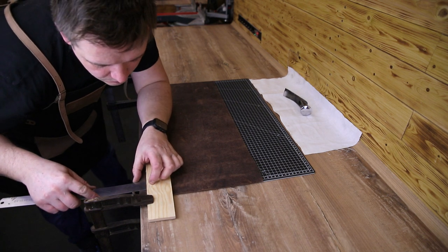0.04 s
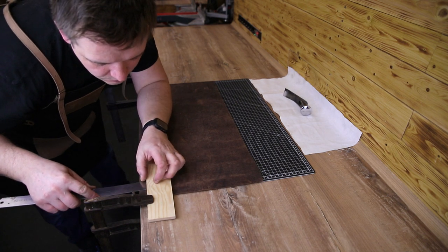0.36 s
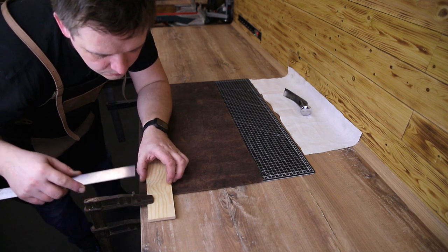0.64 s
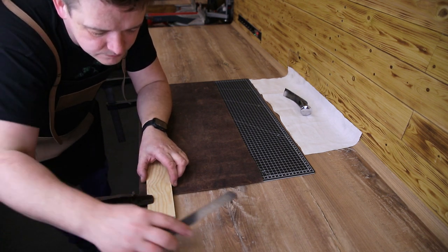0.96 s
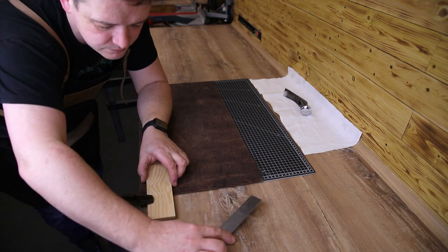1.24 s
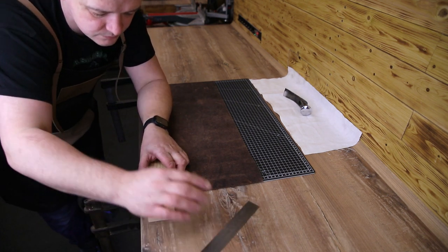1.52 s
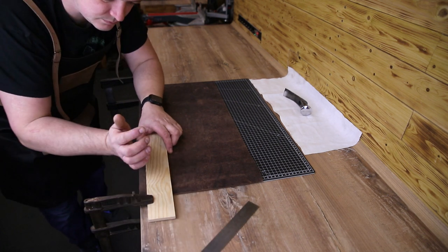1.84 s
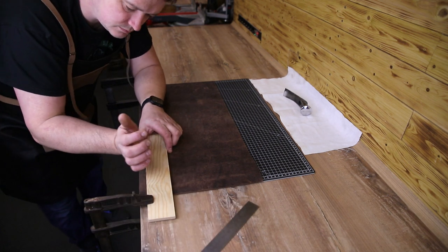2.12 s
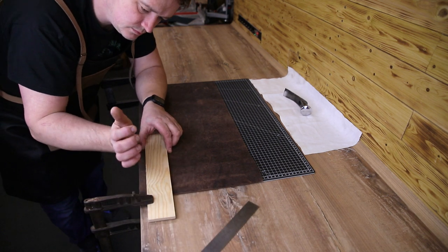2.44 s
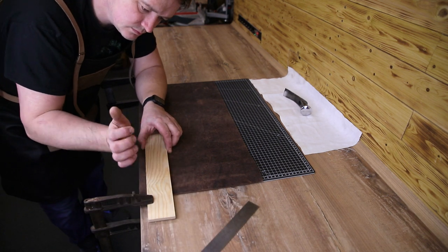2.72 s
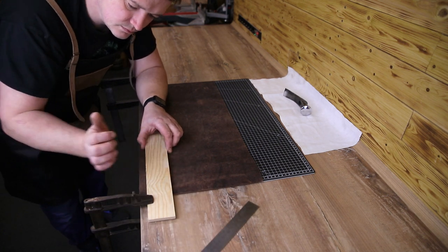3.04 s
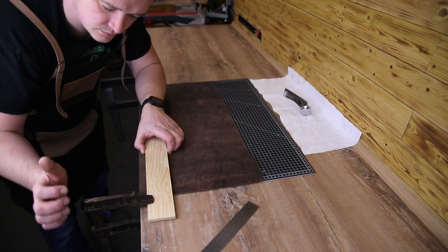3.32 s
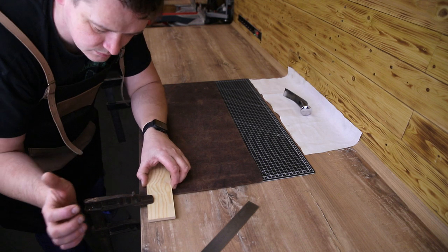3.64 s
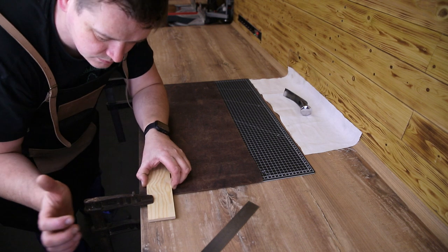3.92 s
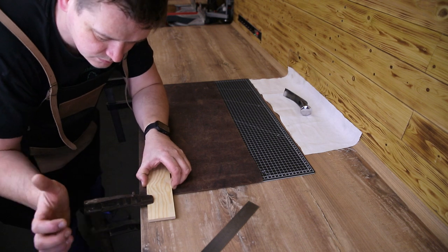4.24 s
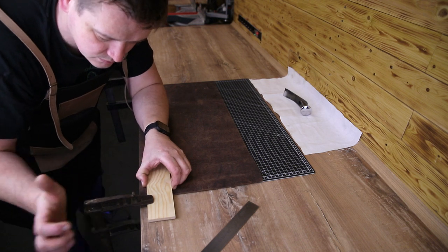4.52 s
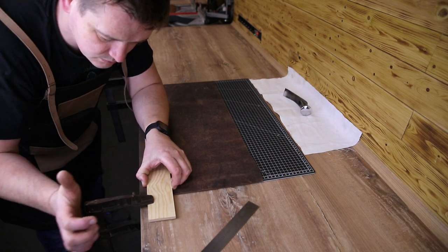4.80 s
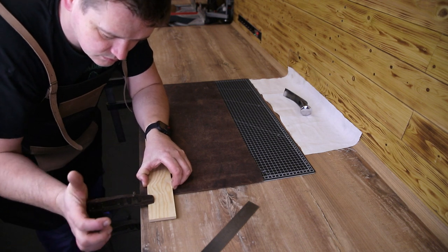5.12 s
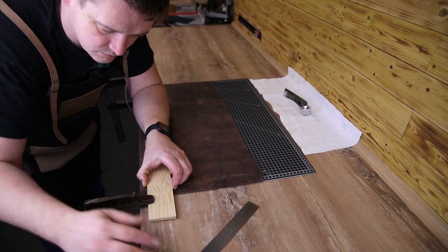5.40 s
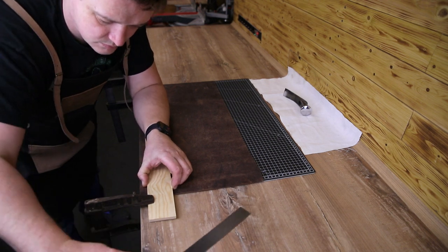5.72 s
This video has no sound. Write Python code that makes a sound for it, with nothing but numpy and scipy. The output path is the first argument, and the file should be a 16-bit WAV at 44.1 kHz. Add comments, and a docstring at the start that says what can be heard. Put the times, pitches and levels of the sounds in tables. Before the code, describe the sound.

In a small workshop, a sleeve rustles faintly over a low room rumble. A steel rule drops onto the wooden bench with a sharp, ringing clatter and is nudged aside. A hand brushes and pats a clamped wooden strip, which clacks hollowly. Four knocks at the clamp grow harder, making the bench boom. Finally the rule scrapes briefly across the wood, all heard from nearby.

```python
"""Over a low room rumble, a sleeve rustles and a hand brushes and pats a clamped strip of wood.
A steel rule drops on the workbench: it cracks, bounces, rings bright and is pushed aside.
The hand slides along the strip, which clacks hollowly under its clamp, then knocks at the clamp four
times, harder and harder; the bench booms and the clamp shudders. Last, the rule is dragged over the
bench, scraping and singing, with one tiny squeak. The small workshop reflects every move."""
import sys
import numpy as np
from scipy import signal
from scipy.fft import rfft, irfft
from scipy.io import wavfile
from scipy.ndimage import uniform_filter1d

SR = 44100
rng = np.random.default_rng(int(sys.argv[2]) if len(sys.argv) > 2 else 0)


def log_audio(samples):
    """Write samples as a 16-bit WAV file to the path given in sys.argv[1]."""
    # one column per channel
    frames = np.atleast_2d(samples).T
    # limit to full scale, then quantise
    limited = np.clip(frames, -1, 1)
    pcm = np.round(limited * 32767).astype(np.int16)
    wavfile.write(sys.argv[1], SR, pcm)


N = 262836
TIME = np.arange(N) / SR
RING_TIME = TIME[:SR // 2]

# Noise colours, shape only: freq_hz, density_db
ROOM_RUMBLE = [(12, -29.5), (20, -13), (59, -5.5), (93, -9), (161, -8.5), (282, -15), (352, -17.5),
               (535, -20.5), (598, -18.5), (727, -20), (934, -19.5), (2210, -27), (3090, -28),
               (15600, -40.5)]
SLEEVE_RUSTLE = [(88, -38.5), (150, -14.5), (193, -5.5), (386, -4.5), (477, -11), (535, -7.5), (1030, -6),
                 (6300, -20), (15000, -34.5)]
SKIN_RUB = [(100, -15.5), (400, -2), (700, -5.5), (1200, 4.5), (2000, -0.5), (3200, 1.5), (5000, -5),
            (8000, -7.5), (11000, -16), (15500, -26.5)]
HARD_TICK = [(100, -8), (500, 3), (1400, 7.5), (2200, 1), (3200, 0.5), (4800, -2), (6200, -1.5), (7400, -2),
             (8700, -3.5), (9500, -13), (15500, -20)]
WOOD_SLAP = [(60, -24.5), (150, -9), (350, -5), (500, -8), (690, -4), (900, -4.5), (1300, -4), (2000, -13),
             (3000, -19.5), (4000, -22.5), (5500, -27), (9000, -33.5), (15500, -43.5)]
BENCH_THUD = [(40, -21), (80, -4), (105, -8), (140, -1.5), (250, -1), (400, -3.5), (680, -1.5),
              (1200, -14.5), (4000, -44)]
STEEL_CRACK = [(60, -25), (200, -18.5), (370, -4), (550, -6), (900, -8.5), (1700, 0), (2800, -1.5),
               (4400, 2), (5500, -1.5), (7400, 1.5), (9000, -11), (15500, -11)]
STEEL_SIZZLE = [(1000, -30.5), (4000, -12), (5600, -7), (6400, 11.5), (7400, -4.5), (8400, -7.5),
                (11000, -9.5), (15500, -23)]  # the crowd of weak modes between the rule's strong ones
STEEL_SCRAPE = [(100, -16.5), (400, -8), (700, -9), (1000, -4), (1500, -2), (2100, -6), (2600, -3.5),
                (3700, -7), (5000, -12.5), (6800, -10.5), (9000, -19), (15500, -32.5)]
CLAMP_CHATTER = [(60, -25), (120, -7), (195, 6), (270, -2.5), (320, -7.5), (380, -1.5), (600, -16.5),
                 (1000, -24), (3000, -50), (15000, -77)]

# Steel modes: freq_hz, level_db, t60_s
CLINK_MODES = [(2870, -2.5, 0.058), (3370, 1.5, 0.044)]  # under a light touch
HELD_RULE_MODES = [(375, -8, 0.18), (726, -12, .1), (1432, -12, .15), (2570, -8.5, 0.39), (2830, -9, .08),
                   (4210, -9.5, .15)]  # held, leaning on the bench
FREE_RULE_MODES = [(1588, -15.5, .15), (1687, -15.5, 0.08), (2540, -24, 0.17), (2790, -17, 0.092),
                   (4280, -17.5, .1), (4280, -11, .12), (5416, -14, .22), (6180, -8, 0.37), (6530, -8, .3),
                   (6417, -3, .3), (6825, -13.5, .18), (6860, -8, 0.2), (7104, 0.5, 0.26), (7520, -9, 0.37),
                   (8280, -13.5, .18), (7880, -9, .15), (8470, -21, .2), (8700, -23, 0.28),
                   (8430, -15.5, 0.33), (8910, -22.5, 0.74), (9685, -25.5, .2), (9940, -17, 0.13),
                   (10540, -21, 0.26), (10400, -27, .2), (12460, -26, .15), (15430, -33.5, 0.1536)]
# Resonances of the wooden strip: freq_hz, width_hz, gain_db
STRIP_RESONANCES = [(428.8, 97, -2), (1245, 75, -3.5), (1670, 55, -7), (2779, 81, 3.5)]
# Modes of the bench with its clamp: freq_hz, level_db
BENCH_MODES = [(80, -3.5), (140, 4), (160, -9.5), (199, 2), (222, 1.5), (257, -1), (339, -3), (374, 6),
               (441, -9.5), (492, -6.5), (576, -4), (635, -6.5), (705, -9.5), (885, -1.5), (1055, -2.5)]
# Decay of the workshop: freq_hz, t60_s
ROOM_DECAY = [(100, 0.94), (300, 0.52), (800, 0.36), (2000, 0.39), (5000, 0.51), (9000, 0.27),
              (15000, 0.33)]

# Cue levels below are relative; each layer adds its own trim.
# Rubbing moves: start_s, end_s, level_db
SLEEVE_MOVES = [(.44, .7, -60), (.96, 1.45, -56.5), (2.0, 2.15, -61.5), (2.38, 2.54, -60),
                (3.24, 3.7, -55.5), (3.8, 4.15, -64)]
STRIP_SLIDES = [(1.76, 1.98, -46), (3.425, 3.655, -44.6)]
# The palm brushes past the wood: middle_s, level_db, half_length_s
PALM_BRUSHES = [(0.498, -52, 0.024), (0.746, -58, 0.028), (1.152, -56.5, 0.018), (2.458, -39, 0.015),
                (2.703, -41, 0.017), (2.982, -41.5, 0.017), (3.055, -49.5, 0.011)]
# Small hard contacts: start_s, level_db, t60_s
LIGHT_TAPS = [(0.63, -50, 0.016), (2.024, -43.5, 0.0044), (2.086, -49, 0.017), (2.669, -46.5, .02),
              (2.951, -45, 0.0094), (4.206, -52, .05), (4.467, -51.5, 0.028), (3.3936, -83, .01),
              (5.6937, -35.5, 0.04)]
# The strip shifts under the clamp: start_s, level_db, pitch_hz, t60_s
STRIP_SHIFTS = [(.633, -42, 365, .1), (2.452, -42, 435, 0.15), (2.968, -27.5, 387, 0.11),
                (3.4735, -31.5, 552, .055), (4.207, -36, 480, 0.052), (4.488, -31, 387, 0.068),
                (5.1195, -11, 680, 0.039)]
# The hand lands on the strip, and at 1.669 s lets go of the pushed rule: start_s, slap_db, contact_s, thump_db,
# thump_centre_hz
HAND_PATS = [(1.123, -46.5, .0012, -62, 300), (1.259, -48, 0.0039, -53.5, 407),
             (1.669, -51, 0.0077, -44.5, 168), (2.675, -30.5, 0.0074, -33.5, 132),
             (2.951, -30, 0.0063, -23.5, 132), (3.3922, -27, 0.00032, -37.5, 460),
             (3.949, -51, 0.0087, -48, 333)]
# One end of the held rule meets the bench: start_s, level_db, t60_s
RULE_TOUCHES = [(1.4575, -24.5, .2), (1.4867, -21, 0.027), (1.4905, -16, .04)]
# Let go, the rule slaps down and bounces: start_s, level_db
RULE_BOUNCES = [(1.4958, -10), (1.5052, -16.5), (1.5129, -16), (1.5217, -24), (1.5285, -29), (1.5425, -33)]
# Knocks at the clamp: start_s, force_db, thump_db, thump_centre_hz
CLAMP_KNOCKS = [(4.199, -35, -33.5, 165.3), (4.465, -34, -32, 213), (4.7755, -19.5, -19.5, 256),
                (5.1168, -13, -18, 207)]
# Fader curves of the dragged rule: time_s, scrape_db, ring_db
RULE_DRAG = [(5.71, -48.5, -62), (5.748, -56.5, -71), (5.77, -47, -48), (5.842, -40, -39),
             (5.868, -37.5, -55), (5.894, -45.5, -56), (5.938, -45.5, -71), (5.96, -50, -63)]


def amp(db):
    """Decibels to gain."""
    return 10 ** (np.asarray(db) / 20)


def unit(x):
    """Scales to rms 1."""
    return x / np.sqrt(np.mean(x ** 2) + 1e-20)


def read(points, hz):
    """Reads a curve on a logarithmic frequency axis."""
    freq_hz, value = np.transpose(points)
    return np.interp(np.log(hz + 1), np.log(freq_hz), value)


def add(mix, start_s, sound):
    """Lays a stereo sound into the mix."""
    part = mix[:, round(start_s * SR):][:, :sound.shape[1]]
    part += sound[:, :part.shape[1]]


def colour(x, spectrum, cut_hz=np.inf, size=4096):
    """Causal EQ to a spectrum; a soft contact passes little above cut_hz."""
    hz = abs(np.fft.fftfreq(size, 1 / SR))
    rolloff_db = -10 * np.log10(1 + (hz / cut_hz) ** 4)
    log_gain = np.log(amp(read(spectrum, hz) + rolloff_db))
    taps = np.fft.ifft(np.exp(np.conj(signal.hilbert(log_gain)))).real  # minimum phase
    return signal.oaconvolve(x, taps[None, :size // 2], axes=1)[:, :x.shape[1]]


def noise(count, side_db):
    """Mid/side noise; side_db sets the width."""
    mid, side = rng.standard_normal((2, count))
    return mid + amp(side_db) * np.array([side, -side])


def flutter(samples):
    """A random modulator of rms 1, smoothed over so many samples."""
    return unit(uniform_filter1d(rng.standard_normal(N), size=samples))


def friction(grain_db, side_db):
    """Countless tiny slips, clumped by the grain of the surface."""
    clumps = amp(grain_db * flutter(90))
    return unit(noise(N, side_db) * clumps)


def even_noise(envelope):
    """Noise under an envelope, evened out to drive all frequencies alike."""
    x = rng.standard_normal((2, len(envelope))) * envelope
    limit = 2 * envelope / np.linalg.norm(envelope)
    for _ in range(4):
        spectrum = rfft(x)
        flat = irfft(spectrum / (abs(spectrum) + 1e-12), len(envelope))
        x = np.clip(flat, -limit, limit)
    return x


def blow(spectrum, rise_s, t60_s, side_db, cut_hz=np.inf, size=8192):
    """A contact excites many short-lived modes at once, with the energy of 5 ms at rms 1."""
    t = TIME[:size]
    attack = np.minimum(t / rise_s, 1) ** 2
    decay = amp(-60 * np.maximum(t - rise_s, 0) / t60_s)
    mid, side = even_noise(attack * decay)
    burst = colour(mid + amp(side_db) * np.array([side, -side]), spectrum, cut_hz)
    return unit(burst) * np.sqrt(.005 * SR / size)


def ring(modes, spread_rad):
    """Dying modes, each a little out of phase between left and right."""
    hz, db, t60_s = np.transpose(modes)[:, :, None]
    phase = 2 * np.pi * rng.random(len(hz)) + spread_rad * rng.standard_normal((2, len(hz)))
    waves = amp(db) * np.exp((2j * np.pi * hz - np.log(1000) / t60_s) * RING_TIME)
    return (np.exp(1j * phase) @ waves).real


def strokes(moves, attack_s, release_s):
    """Envelope of a set of moves: each swells, holds from start to end, and fades."""
    gain = np.zeros(N)
    for start_s, end_s, db in moves:
        outside = np.maximum(start_s - TIME, 0) / attack_s + np.maximum(TIME - end_s, 0) / release_s
        gain += amp(db) * np.exp(-outside ** 2)
    return gain


def favoured(table, centre_hz, focus=2.2):
    """The place and softness of a blow favour the band around centre_hz."""
    return [(hz, db - 10 * np.log10(1 + (focus * (hz / centre_hz - centre_hz / hz)) ** 2))
            for hz, db in table]


def harder(force_db, doubling_db, reference_db=-33):
    """A factor that doubles for each doubling_db above a gentle reference knock."""
    return 2 ** ((force_db - reference_db) / doubling_db)


def room_tone():
    """A steady bed of low rumble and hiss."""
    return amp(-56) * unit(colour(noise(N, side_db=-3), ROOM_RUMBLE, size=16384))


def rubbing():
    """The sleeve rustles as the arm moves; skin sweeps over wood."""
    skin = unit(colour(friction(grain_db=1, side_db=-6), SKIN_RUB))
    cloth = unit(colour(friction(grain_db=1, side_db=-10.5), SLEEVE_RUSTLE))
    moves = strokes(SLEEVE_MOVES, attack_s=.05, release_s=.07)
    brushes = sum(amp(db) / (1 + ((TIME - s) / half_s) ** 2) ** 2 for s, db, half_s in PALM_BRUSHES)
    slides = strokes(STRIP_SLIDES, attack_s=.014, release_s=.014)
    return moves * cloth + through_strip(brushes * skin) + slides * skin


def through_strip(x):
    """The strip adds its woody resonances to a contact."""
    return x + sum(amp(db) * signal.lfilter(*signal.iirpeak(hz, hz / width_hz, SR), x)
                   for hz, width_hz, db in STRIP_RESONANCES)


def ticks(clink_db=-5.5):
    """Light, hard touches, each with a short metallic clink."""
    out = np.zeros((2, N))
    for s, db, t60_s in LIGHT_TAPS:
        add(out, s, amp(db) * blow(HARD_TICK, rise_s=.00069, t60_s=t60_s, side_db=-4.5))
        add(out, s, amp(db + clink_db) * ring(CLINK_MODES, spread_rad=1))
    return out


def strip_clacks(rise_s=.003, tone_db=-1, grain_db=-6):
    """The shifting strip clacks: one hollow, heavily damped resonance with some grain around it."""
    out = np.zeros((2, N))
    swell = 1 - np.exp(-(RING_TIME / rise_s) ** 2)
    for s, db, hz, t60_s in STRIP_SHIFTS:
        add(out, s, swell * ring([(hz, db + tone_db, t60_s)], spread_rad=.19))
        grain = blow(favoured(WOOD_SLAP, hz, focus=4), rise_s, t60_s, side_db=-26)
        add(out, s, amp(db + grain_db) * grain)
    return out


def hand_slaps():
    """Pats and knocks smack on the wood; a harder knock is snappier, shorter and brighter."""
    out = np.zeros((2, N))
    for s, db, contact_s, _, _ in HAND_PATS:
        t60_s = .014 + 8 * contact_s  # a slow contact lingers
        add(out, s, amp(db) * blow(WOOD_SLAP, contact_s, t60_s, side_db=-17.5, cut_hz=8000))
    for s, db, _, _ in CLAMP_KNOCKS:
        rise_s = .009 / harder(db, doubling_db=27.5)
        t60_s = .07 / harder(db, doubling_db=14.5)
        cut_hz = 2270 * harder(db, doubling_db=10.5)
        add(out, s, amp(db) * blow(WOOD_SLAP, rise_s, t60_s, side_db=-13.5, cut_hz=cut_hz))
    return amp(-2) * through_strip(out)


def bench_thumps(swell_s=.011, lag_s=.018, boom_t60_s=.24, boom_db=-2, thud_db=-2.5):
    """The heavy bench takes up each push slowly: a dull thud and a few booming modes."""
    out = np.zeros((2, N))
    swell = 1 - np.exp(-(RING_TIME / swell_s) ** 2)
    pushes = [(s, db, hz) for s, _, _, db, hz in HAND_PATS]
    for s, force_db, db, hz in CLAMP_KNOCKS:  # the bench follows a harder knock sooner
        pushes.append((s + lag_s / harder(force_db, doubling_db=5), db, hz))
    for s, db, centre_hz in pushes:
        modes = [(hz, mode_db, boom_t60_s) for hz, mode_db in favoured(BENCH_MODES, centre_hz)]
        add(out, s, amp(db + boom_db) * swell * ring(modes, spread_rad=.22))
        thud = blow(favoured(BENCH_THUD, centre_hz), rise_s=.017, t60_s=.15, side_db=-15.5)
        add(out, s, amp(db + thud_db) * thud)
    return out * amp([[.5], [-.5]])  # a touch left


def steel_ring(spread_rad=.72, sizzle_db=-6.5, sizzle_t60_s=.14):
    """The rule's answer to one tap: strong modes over a dense sizzle."""
    modes = ring(FREE_RULE_MODES, spread_rad)
    sizzle = unit(colour(noise(len(RING_TIME), side_db=-4.5), STEEL_SIZZLE))
    return modes + amp(sizzle_db) * sizzle * amp(-60 * RING_TIME / sizzle_t60_s)


def rule_clatter(ring_db=-14, buzz=.3, grip_s=1.555):
    """The rule clanks down end first; each bounce cracks on the wood and feeds a buzzing ring."""
    cracks, rings = np.zeros((2, 2, N))
    for s, db, t60_s in RULE_TOUCHES:  # still held: the hand dulls the crack and holds back the ring
        crack = blow(STEEL_CRACK, rise_s=.00087, t60_s=t60_s, side_db=-6.5, cut_hz=4600)
        add(cracks, s, amp(db) * crack)
        add(rings, s, amp(db + ring_db) * steel_ring())
    first_s, first_db, _ = RULE_TOUCHES[0]
    add(cracks, first_s, amp(first_db) * ring(HELD_RULE_MODES, spread_rad=.26))
    for s, db in RULE_BOUNCES:
        crack = blow(STEEL_CRACK, rise_s=.0005, t60_s=.021, side_db=-9, cut_hz=15000)
        add(cracks, s, amp(db) * crack)
        add(rings, s, amp(ring_db + .36 * db) * steel_ring())  # even faint bounces ring well
    chatter = 1 + buzz * flutter(70)
    damping = np.exp(-np.maximum(TIME - grip_s, 0) / .004)  # a finger chokes the steel's ring from here on
    return (cracks + rings * chatter * damping) * amp([[-.6], [.6]])  # a touch right


def rule_slides(damp_s=.045):
    """Pushed, later dragged, the steel scrapes over wood; the slips keep its hand-damped modes singing."""
    slips = friction(grain_db=1.5, side_db=-7.5)
    damped_ring = steel_ring(spread_rad=.93, sizzle_db=-1) * np.exp(-RING_TIME / damp_s)
    singing = signal.oaconvolve(slips, damped_ring, axes=1)[:, :N]
    push = strokes([(1.575, 1.693, 0)], attack_s=.053, release_s=.06)
    drag_s, scrape_db, ring_db = np.transpose(RULE_DRAG)
    scrape_gain = amp(-40.5) * push + amp(.5 + np.interp(TIME, drag_s, scrape_db, left=-np.inf))
    sing_gain = amp(-35.5) * push + amp(-5 + np.interp(TIME, drag_s, ring_db, left=-np.inf))
    return scrape_gain * unit(colour(slips, STEEL_SCRAPE)) + sing_gain * unit(singing)


def clamp_shudders(shudder_db=-10, rattle_db=-12):
    """The loose clamp chatters on the bench after a knock, then seats itself; its screw rattles on."""
    chatter = unit(colour(friction(grain_db=2.5, side_db=-14), CLAMP_CHATTER))
    spells = [(s + .018, s + .086, thump_db + shudder_db) for s, _, thump_db, _ in CLAMP_KNOCKS]
    out = strokes(spells, attack_s=.016, release_s=.016) * chatter
    for s, force_db, _, _ in CLAMP_KNOCKS:
        cut_hz = 650 * harder(force_db, doubling_db=4)  # far brighter after a harder knock
        rattle = blow(WOOD_SLAP, rise_s=.04, t60_s=.34, side_db=-22, cut_hz=cut_hz, size=16384)
        add(out, s, amp(force_db + rattle_db) * rattle)
    return out


def edge_squeak(middle_s=5.932, half_length_s=.0099, pitch_hz=2400, waver=.04):
    """The steel edge catches for a moment: a few quick, nearly regular slips."""
    hz = pitch_hz * (1 + waver * flutter(60))
    tone = unit(np.sin(2 * np.pi * np.cumsum(hz) / SR))
    return amp(-40) * np.exp(-((TIME - middle_s) / half_length_s) ** 2) * tone


def workshop_reverb(send, predelay_s=.006):
    """Dense reflections, each band dying at its own speed; the bass stays nearly mono."""
    taps = rng.choice([-1., 1.], (2, SR)) * (TIME[:SR] > predelay_s)
    hz, t, (mid, side) = signal.stft(taps, SR, nperseg=512)
    side = side * np.minimum(.25 + .25 * hz / 1100, .85)[:, None]
    decay = amp(-60 * t / read(ROOM_DECAY, hz)[:, None])
    _, tail = signal.istft(np.array([mid + side, mid - side]) * decay, SR, nperseg=512)
    return signal.fftconvolve(send, tail / np.linalg.norm(tail[0]), axes=1)[:, :N]


def scene():
    """Four groups, each with its own reverb send, over the room tone."""
    clatter = rule_clatter()
    smacks = hand_slaps()
    booms = bench_thumps() + strip_clacks() + clamp_shudders()
    details = ticks() + rubbing() + rule_slides() + edge_squeak()
    send = amp(-13) * clatter + amp(-2.5) * smacks + amp(-13) * booms + amp(-9.5) * details
    return clatter + smacks + booms + details + workshop_reverb(send) + room_tone()


def record(dry, widen_above_hz=7000, widening=.65, ceiling=.88, top_hz=15800):
    """Master chain: widen the treble, clip peaks at the ceiling, cut the very top."""
    highpass = signal.butter(2, widen_above_hz, "highpass", fs=SR)
    side = signal.lfilter(*highpass, (dry[0] - dry[1]) / 2)
    clipped = np.clip(dry + widening * np.array([side, -side]), -ceiling, ceiling)
    lowpass = signal.firwin(511, top_hz, window=("kaiser", 9), fs=SR)
    return signal.oaconvolve(clipped, lowpass[None], "same")


dry = scene()
out = record(dry)
log_audio(out)
```